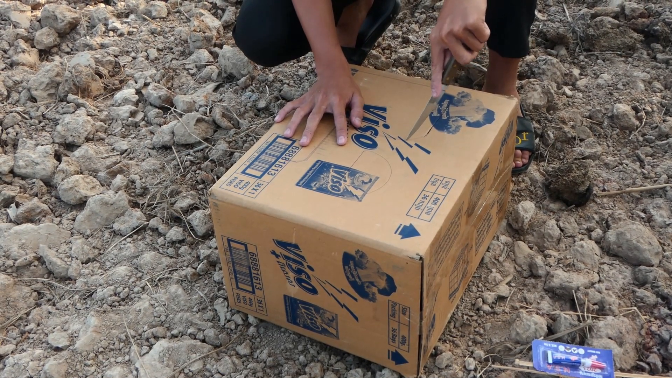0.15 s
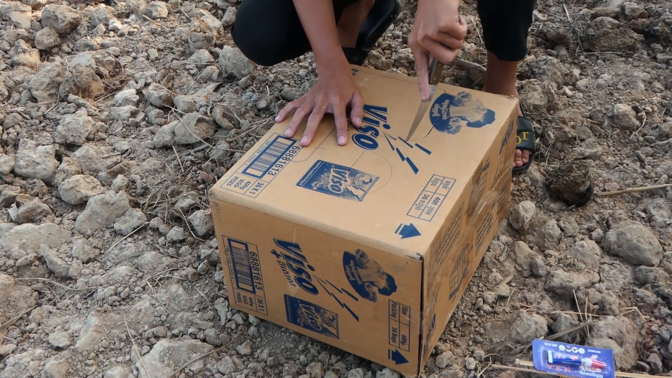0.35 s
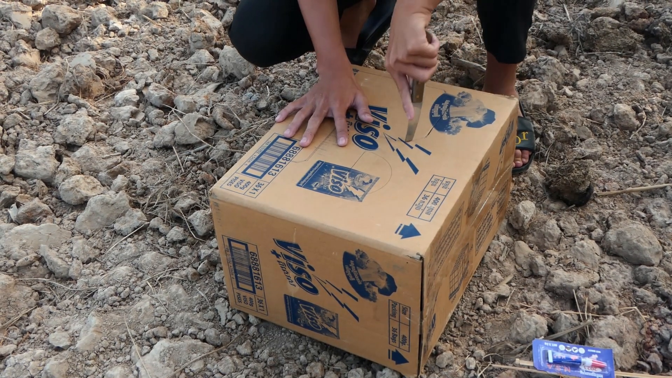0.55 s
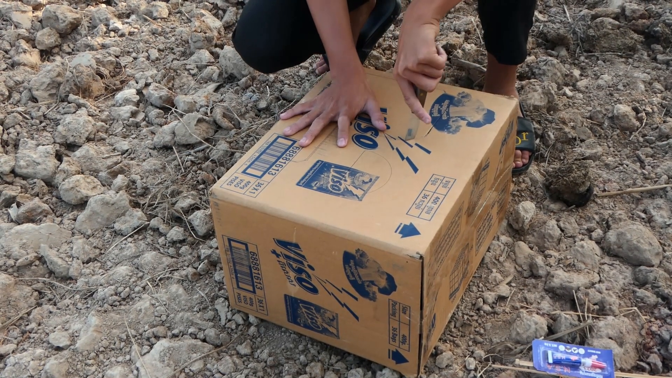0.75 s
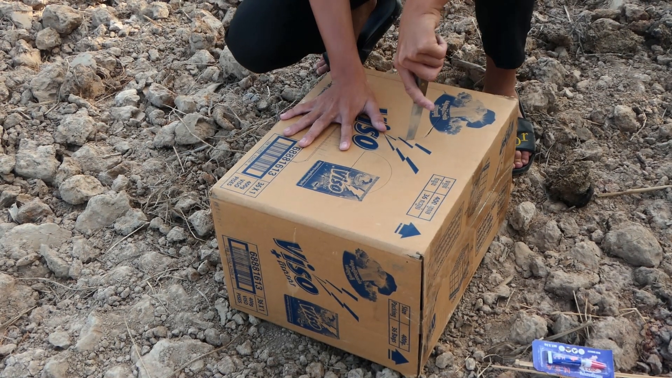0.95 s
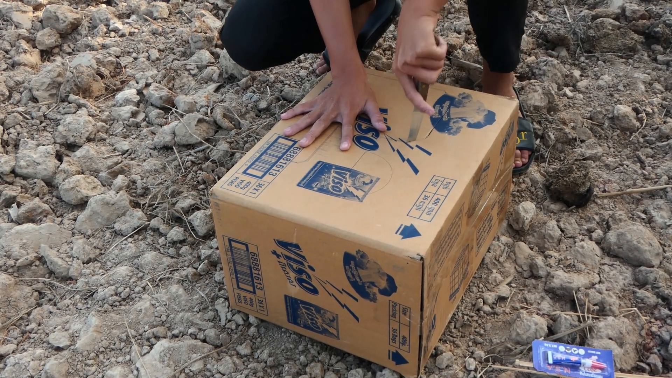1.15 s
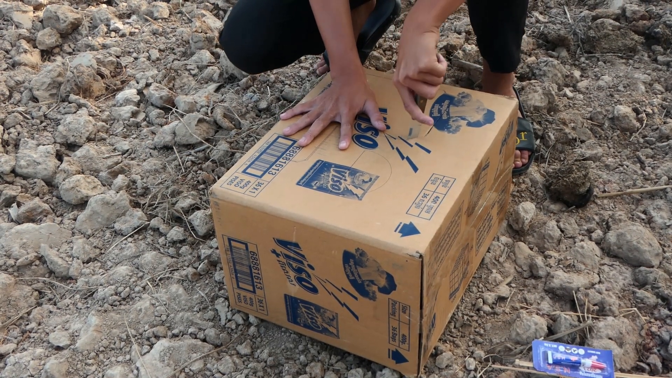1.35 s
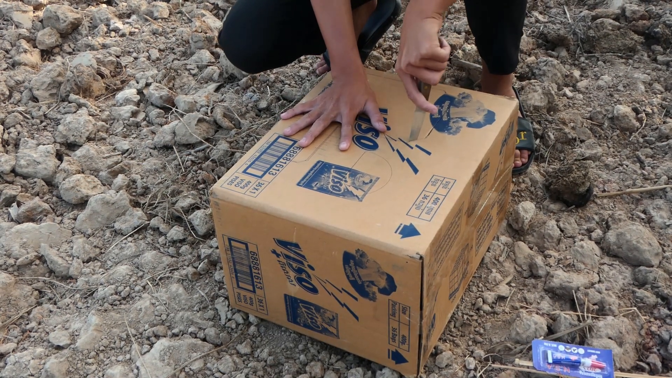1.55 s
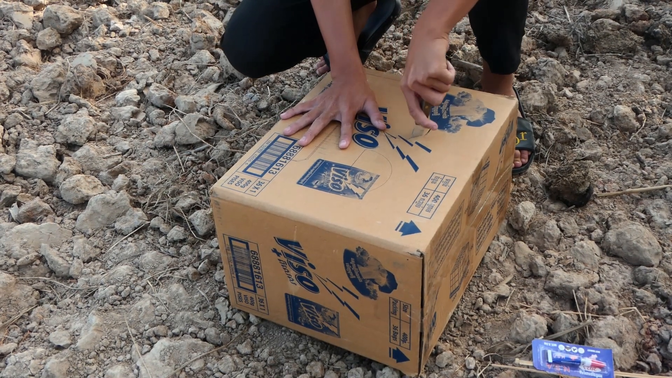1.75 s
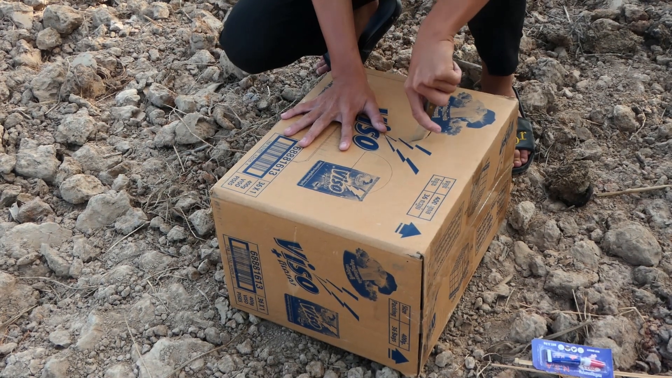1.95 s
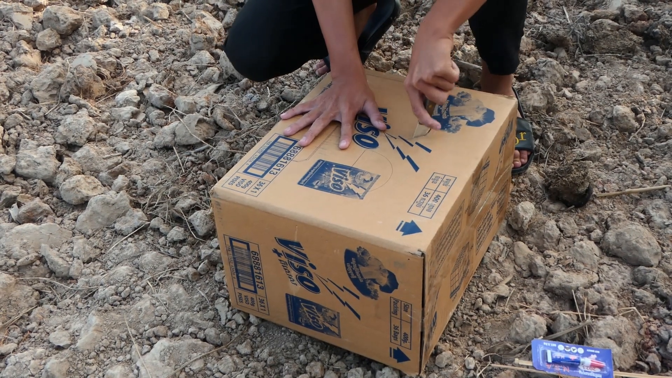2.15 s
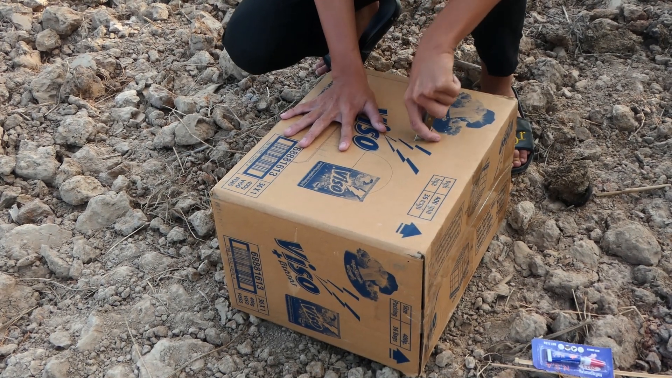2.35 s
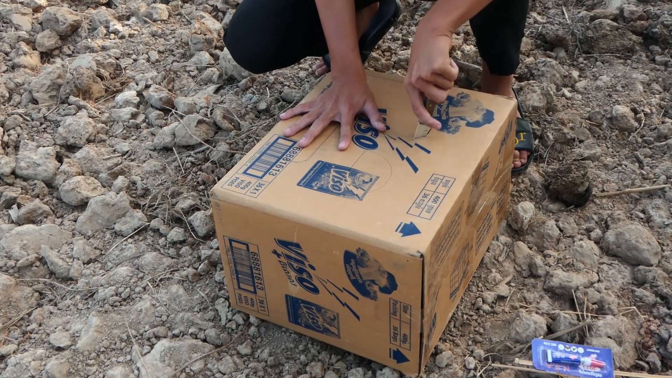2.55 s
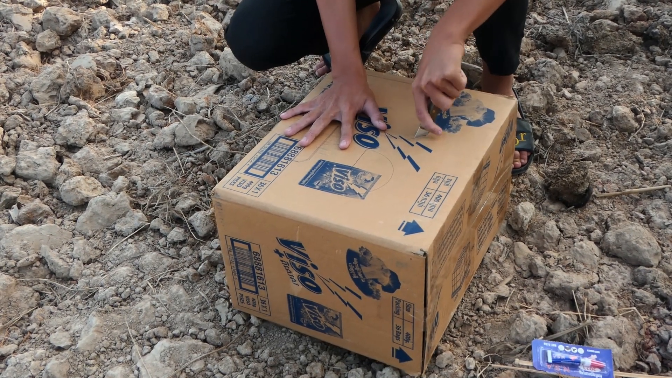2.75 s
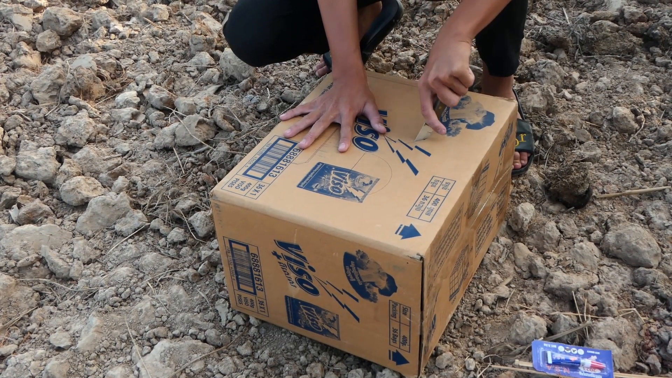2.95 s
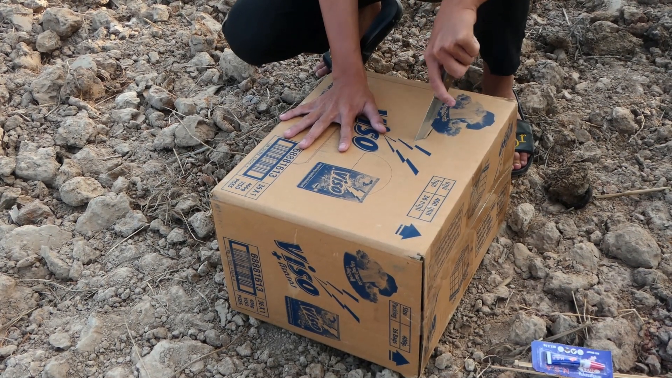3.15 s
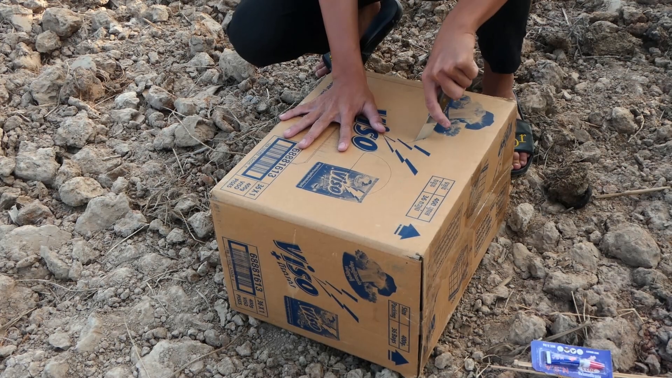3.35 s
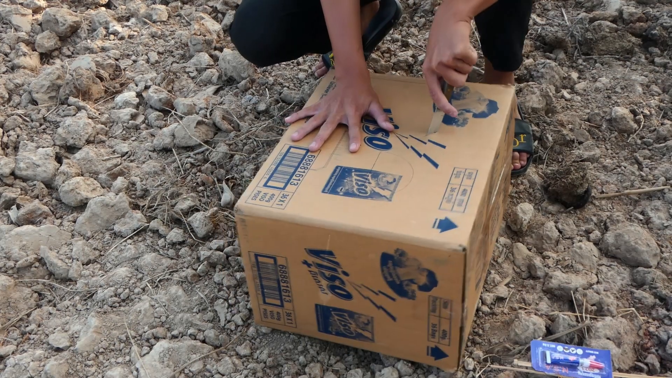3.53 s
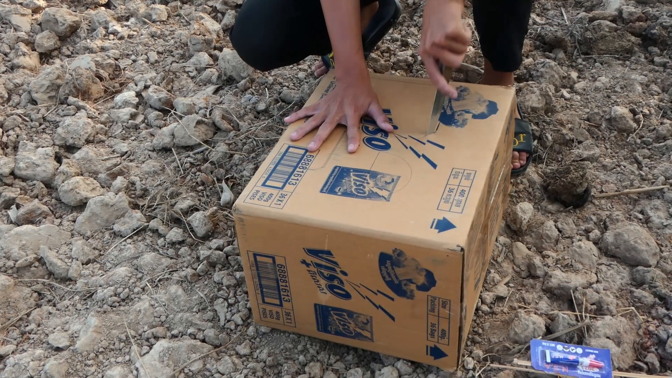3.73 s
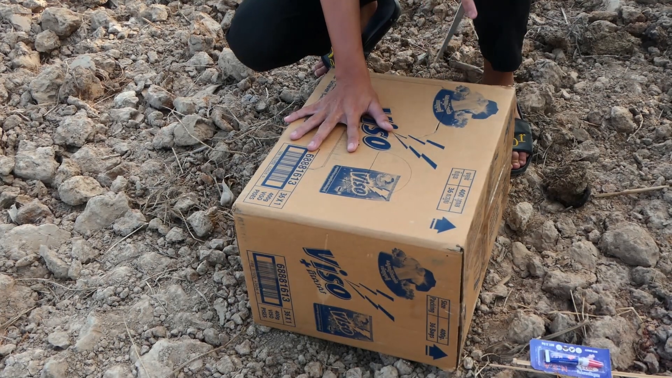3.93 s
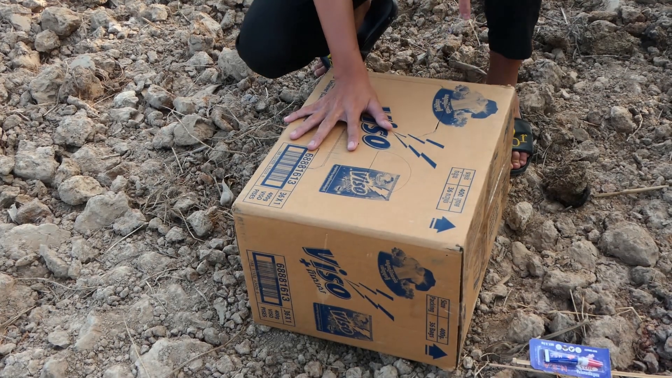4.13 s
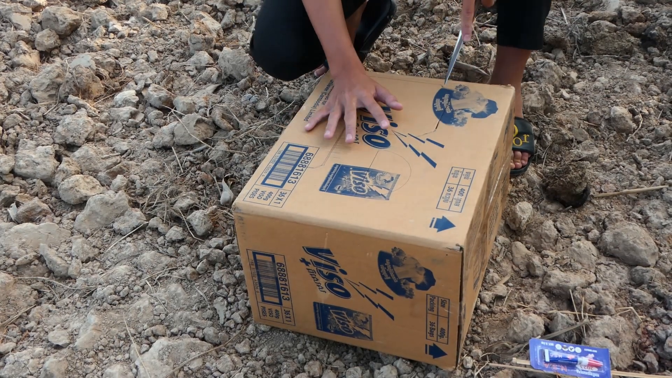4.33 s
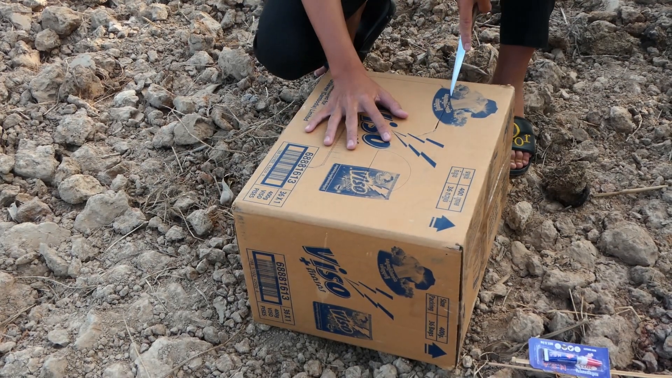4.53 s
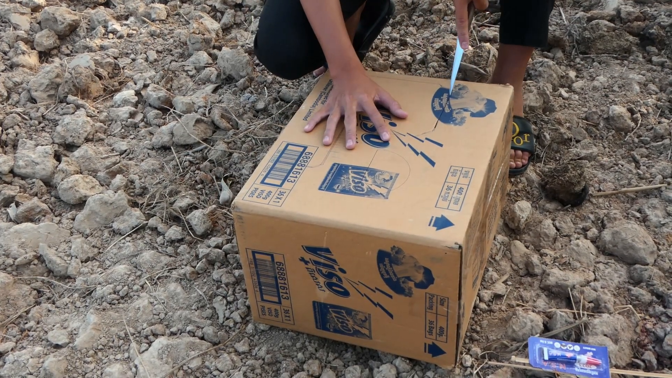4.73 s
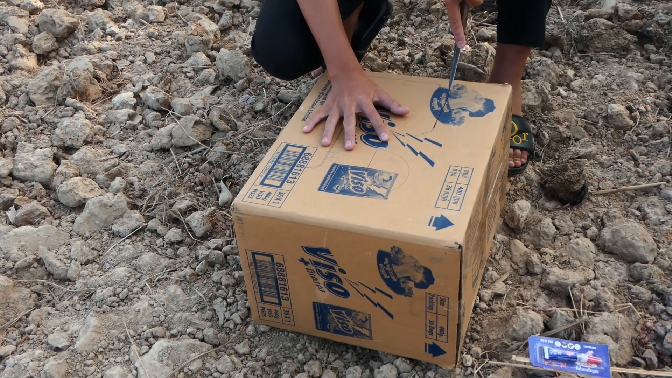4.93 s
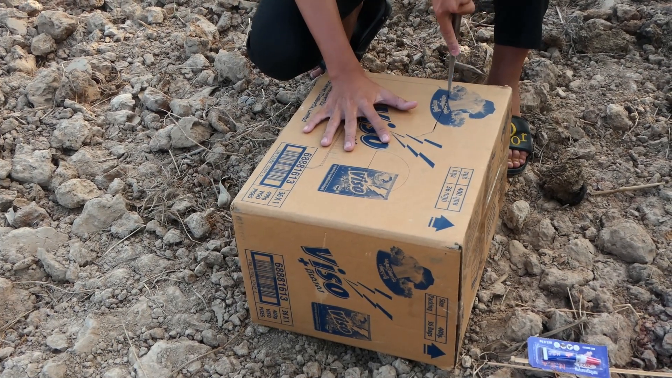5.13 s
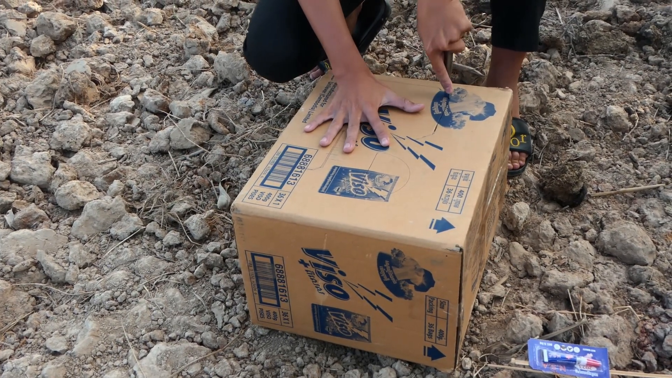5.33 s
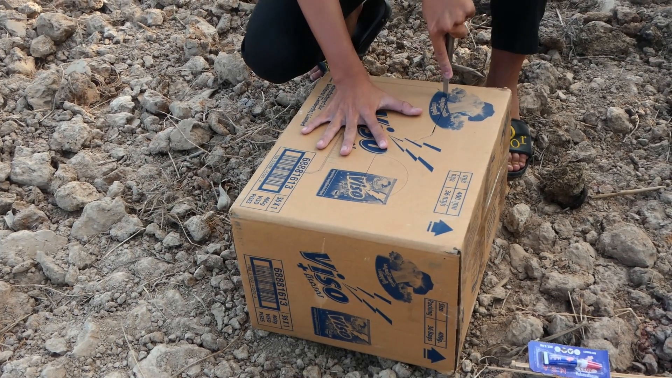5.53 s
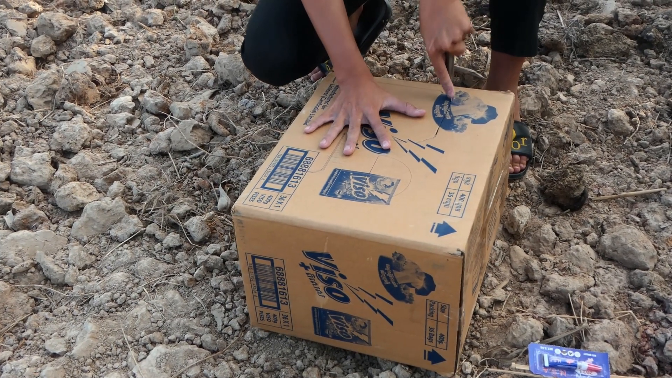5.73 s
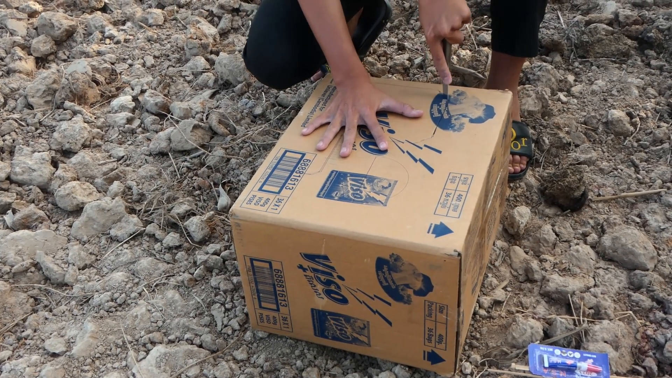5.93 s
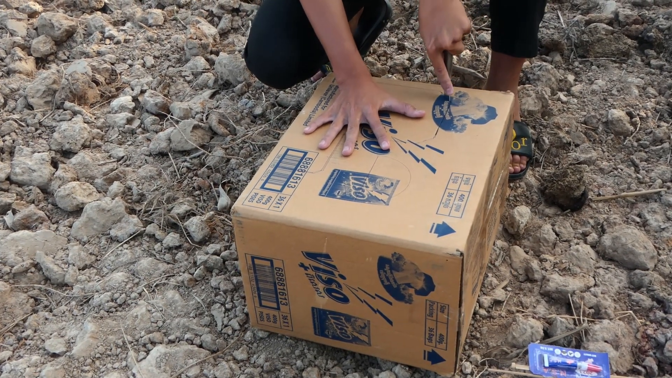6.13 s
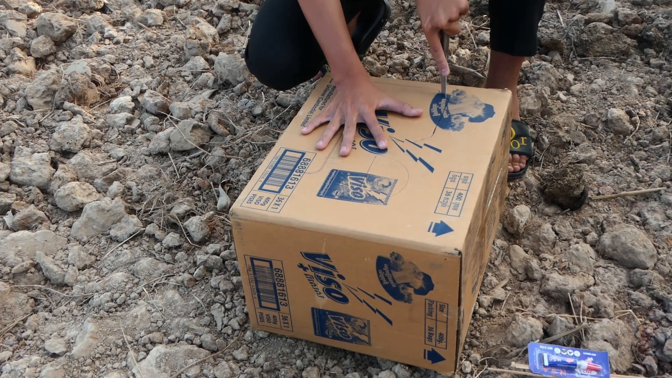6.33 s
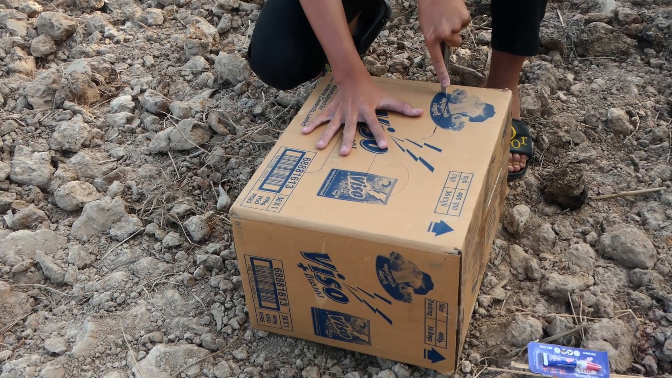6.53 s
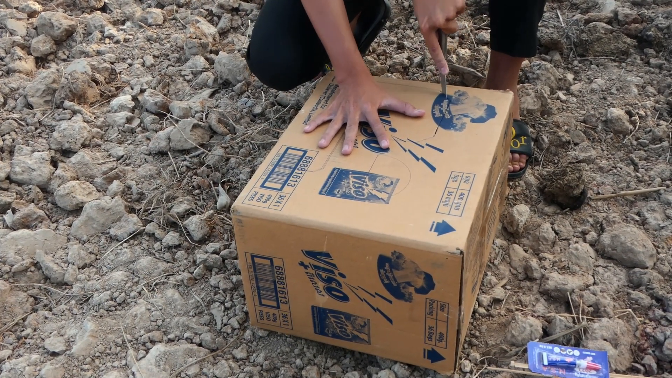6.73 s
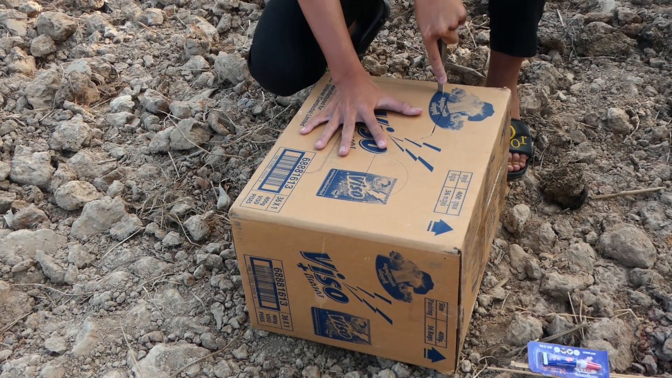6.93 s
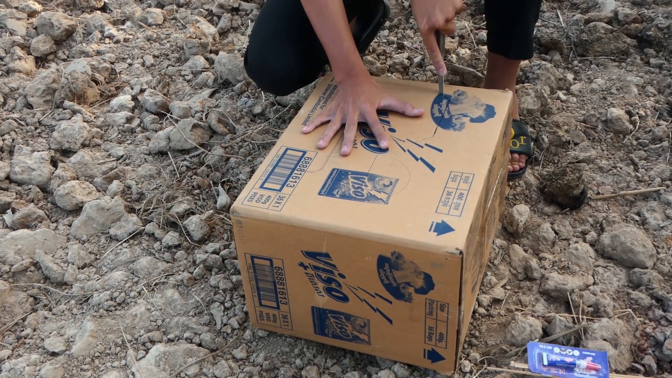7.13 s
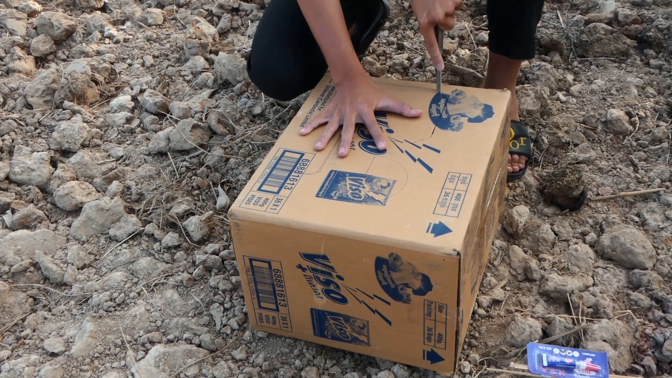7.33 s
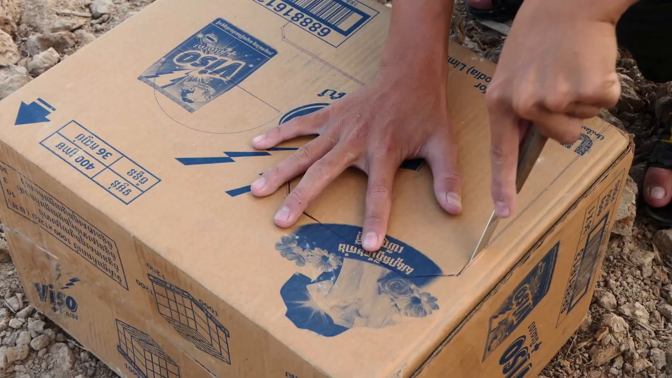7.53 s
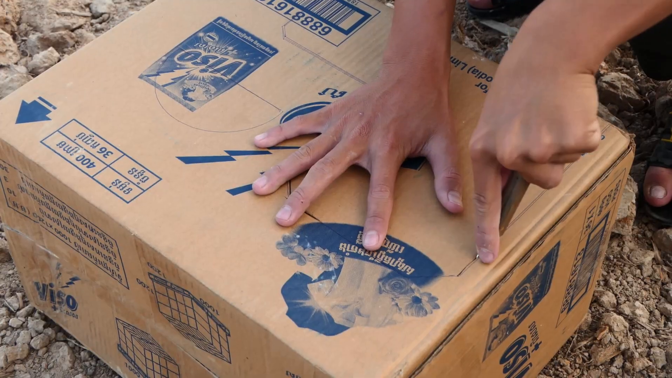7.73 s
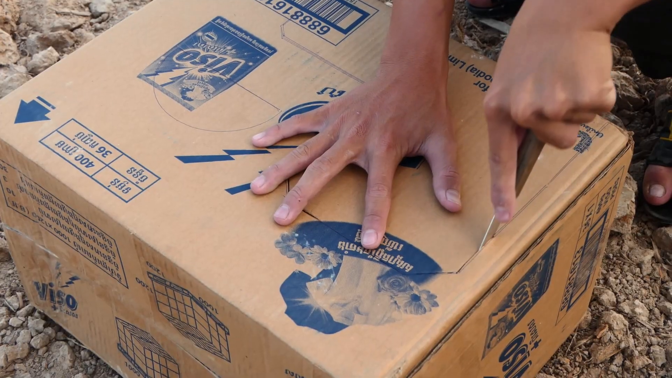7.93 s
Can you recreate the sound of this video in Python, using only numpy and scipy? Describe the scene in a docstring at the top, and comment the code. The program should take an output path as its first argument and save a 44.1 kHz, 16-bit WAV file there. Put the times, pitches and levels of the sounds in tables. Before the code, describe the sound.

A knife saws through the lid of a corrugated cardboard box, outdoors and slightly right of the microphone, over a soft hiss and a faint distant hum. From about 0.2 seconds come short, uneven rasping strokes, around four or five a second, each swelling and stopping with a hollow boom from the box and a fine fizz of tearing fibres. The lid knocks, the board cracks and the blade ticks, with tiny squeaks near 1.4 and 3.5 seconds and a dull crunch at 3.6. The sawing pauses from about 3.9 to 5 seconds, leaving only a few faint bumps. At 5.3 seconds the blade stabs in with a sharp, loud crack, and steadier strokes follow. From about 7.5 seconds a low, lumpy microphone handling rumble runs under a last close stroke and several knocks, until the end just after 8 seconds.

```python
"""A knife rasps through the lid of a corrugated cardboard box, outdoors on dry ground, over a soft hiss
and a far hum. It saws, pauses, stabs in again and saws on, a little right of the microphone.
Each stroke swells as the blade bites and stops as it turns; the tearing fibres drive the hollow box,
the stiff board and a fine fizz. The lid knocks, flutes crack, the blade ticks and squeaks in the slot.
At the end the microphone is close and rumbles with handling."""
import sys
import numpy as np
from scipy import signal
from scipy.fft import rfft, irfft, next_fast_len
from scipy.io import wavfile
from scipy.ndimage import uniform_filter1d, map_coordinates

SR = 44100
rng = np.random.default_rng(int(sys.argv[2]) if len(sys.argv) > 2 else 0)


def inscribe(sig):
    """Save sig as 16-bit PCM at rate SR to the path in sys.argv[1].

    A 1-D sig is mono; a 2-D sig holds one channel per row.
    Samples are clipped to [-1, 1] before scaling.
    """
    pcm = np.round(np.clip(np.atleast_2d(sig).T, -1, 1) * 32767)
    wavfile.write(sys.argv[1], SR, pcm.astype(np.int16))


N = 356328

# The blade taps the slot as it turns round. Each row: time in seconds, relative peak in dB.
BLADE_TAPS = [(0.877, -33), (1.201, -29), (1.574, -35), (1.9833, -26.5), (1.9928, -31), (2.17, -33),
              (2.342, -25), (2.5207, -32), (2.6234, -24), (2.803, -33), (2.9355, -25), (2.954, -43),
              (3.05, -33), (3.2823, -33.5), (3.4404, -32), (5.035, -34), (6.4183, -28.5), (6.6225, -30.5),
              (6.759, -28), (6.796, -30), (7.1267, -29), (7.1694, -33), (7.473, -27.5), (7.5094, -30.5)]


def amp(db):
    """Decibels to gain."""
    return 10 ** (np.asarray(db) / 20)


def unit(x):
    """x at rms 1."""
    return x / np.sqrt(np.mean(x ** 2) + 1e-20)


def along(points, hz):
    """(Hz, value) points read on a log axis."""
    freqs, values = np.transpose(points)
    return np.interp(np.log(hz + 1), np.log(freqs + 1), values)


def curves(rows):
    """One value per sample for each column after the time."""
    times, *columns = np.transpose(rows)
    return [np.interp(np.arange(N) / SR, np.sort(times), column) for column in columns]


def wobble(rate):
    """A smooth random curve, rate knots a second."""
    return map_coordinates(rng.standard_normal(int(N * rate / SR) + 4), [np.arange(N) * rate / SR])


def arch(middle, length, droop_db=12):
    """Gain of a swell that is strongest at its middle and droop_db lower at both ends."""
    position = 2 * (np.arange(N) / SR - middle) / length
    return amp(-np.minimum(droop_db * position ** 2, 200))


def filtered(x, response):
    """x times a response of frequency."""
    size = next_fast_len(x.shape[-1] + 8192)
    return irfft(rfft(x, size) * response(np.fft.rfftfreq(size, 1 / SR)), size)[..., :x.shape[-1]]


def coloured(x, spectrum):
    """x shaped by a (Hz, dB) curve."""
    return filtered(x, lambda hz: amp(along(spectrum, hz)))


def resonate(x, modes, low_hz, high_hz, order):
    """x through a set of resonances that radiate between two edges, at rms 1."""
    def response(hz):
        return sum((-1) ** k * amp(db) * 1j * hz * width / (centre ** 2 - hz ** 2 + 1j * hz * width)
                   for k, (centre, width, db) in enumerate(modes))
    band = signal.butter(order, [low_hz, high_hz], "band", fs=SR, output="sos")
    return unit(signal.sosfilt(band, filtered(x, response)))


def add(track, start, sound, peak_db):
    """Lay a sound into the track, start seconds in."""
    span = track[round(start * SR):][:len(sound)]
    span += amp(peak_db) * sound[:len(span)] / np.abs(sound).max()


def wide_noise(spectrum, side_db):
    """Stereo noise whose middle has rms 1."""
    mid, side = (unit(coloured(rng.standard_normal(N), spectrum)) for _ in range(2))
    return np.array([mid + amp(side_db) * side, mid - amp(side_db) * side])


def background(hum_hz=60.5):
    """Open-air hiss all round, leaning right, and a wavering hum far off."""
    # Each row: time in seconds, mean hiss level in dB, mean hum level in dB.
    levels = [(0, -50.5, -54.5), (2.5, -50.5, -71), (4.8, -50.5, -63), (5.2, -49, -61), (7.54, -48, -52.5),
              (7.64, -57, -62), (7.9, -64, -58), (7.97, -55, -62), (8.08, -47, -59)]
    # The hiss. Each row: frequency in Hz, relative level in dB.
    air_tone = [(20, -45), (45, -3), (100, 12), (160, 5.5), (230, 4), (310, 2.5), (460, -6), (1300, -4),
                (4000, -7.5), (6200, -9), (8000, -16), (12000, -25), (15800, -24)]
    air_db, hum_db = curves(levels)
    air = amp(air_db + 0.49 * wobble(13)) * wide_noise(air_tone, side_db=-5.5) * amp([[-1], [1]])
    hum_peak = amp(hum_db + 1.6 * wobble(4.02)) * np.sqrt(2)
    pitch = hum_hz * (1 + 0.0083 * wobble(11))
    return air + hum_peak * np.sin(2 * np.pi * np.cumsum(pitch) / SR)


def handling():
    """Handling the microphone makes a lumpy rumble at the end."""
    # Each row: time in seconds, mean level in dB.
    levels = [(7.54, -77), (7.56, -34), (7.7, -33), (7.9, -34), (7.96, -33), (8.08, -41)]
    # Each row: frequency in Hz, relative level in dB.
    tone = [(15, -49), (25, -26), (76, -4.5), (130, -0.5), (189, -8), (244, -3), (383, -18), (452, -28.5),
            (900, -35), (1170, -69), (1980, -120)]
    return amp(curves(levels)[0] + 1.6 * wobble(40)) * wide_noise(tone, side_db=-2.5)


def on_ground(x, t60=0.055):
    """The box stands a little to the right; stones scatter its sound differently to each side."""
    # Each row: frequency in Hz, level of the ground scatter in dB.
    spread = [(100, -16), (300, -23.5), (550, -13.5), (1200, -13.5), (4000, -13), (12000, -11.5)]
    # Each row: frequency in Hz, left minus right in dB.
    balance = [(60, 0), (200, -2.5), (600, -2.5), (2200, -3), (4400, -1), (8000, 0)]
    t = np.arange(SR // 16) / SR
    scatter = rng.standard_normal(len(t)) * amp(-60 * t / t60) * (t > .002)
    side = coloured(signal.fftconvolve(x, scatter / np.linalg.norm(scatter))[:N], spread)
    stereo = np.array([x + side, x - side])
    return filtered(stereo, lambda hz: amp(np.outer([.5, -.5], along(balance, hz))))


def grit(rate=300, level_db=-59):
    """Grit rustles faintly under the box and the feet."""
    grains = (rng.random(N) < rate / SR) * rng.uniform(-1, 1, N) * amp(4.5 * wobble(17))
    rustle = coloured(grains, [(150, -17), (400, -1.5), (2000, -2), (6000, -10.5), (14000, -21.5)])
    return amp(level_db) * unit(rustle)


def rocking(hz=88, width_hz=45, gain_db=-1):
    """Under hard strokes the whole box sways on the ground at its lowest resonance."""
    # Each row: middle in seconds, length in seconds, relative level in dB.
    sways = [(2.02, 0.084, -39), (2.12, .14, -47), (2.274, 0.14, -37), (2.61, 0.24, -39),
             (2.88, 0.078, -34.5), (3.639, 0.11, -34)]
    gain = sum(amp(db + gain_db) * arch(middle, length) for middle, length, db in sways)
    return gain * resonate(rng.standard_normal(N), [(hz, width_hz, 0)], low_hz=68, high_hz=158, order=4)


def knocks(swell_s=0.0057, t60=0.05, gain_db=-1.5):
    """The lid gives way or is bumped: a soft push sets it swinging for a few cycles."""
    # Each row: start in seconds, relative peak in dB, panel pitch in Hz.
    bumps = [(0.176, -31.5, 117), (0.257, -17, 193), (0.616, -12, 215), (0.721, -19.5, 242),
             (0.897, -8, 213), (1.421, -21.5, 226), (2.234, -16.5, 308), (2.43, -8, 226),
             (2.582, -17.5, 213), (2.607, -19, 220), (2.875, -27, 150), (3.574, -20, 275),
             (3.586, -12.5, 196), (3.635, -13, 202.5), (4.496, -34, 194), (4.548, -35.5, 163),
             (4.614, -28, 241), (5.032, -36.5, 124), (5.097, -28, 318), (5.199, -28, 189), (5.28, -16, 340),
             (5.32, -19.5, 239), (5.462, -33, 208), (5.889, -25, 250), (5.955, -23.5, 318),
             (6.616, -27, 287), (6.948, -31.5, 290), (7.552, -24, 134), (7.616, -22, 134),
             (7.716, -16.5, 166), (7.79, -21.5, 240), (7.863, -19.5, 239), (7.9, -20, 144),
             (8.038, -24.5, 187)]
    # Each row: multiple of the panel pitch, relative level in dB.
    partials = [(.6, -20.5), (1, 7.5), (1.5, -17), (2.3, -18.5)]
    track, t = np.zeros(N), np.arange(SR // 6) / SR
    envelope = amp(-60 * t / t60) * (1 - np.exp(-(t / swell_s) ** 3))
    for start, db, hz in bumps:
        ring = sum(amp(level + rng.normal(0, 3.3)) * np.sin(2 * np.pi * hz * ratio * t)
                   for ratio, level in partials)
        add(track, start, ring * envelope, db + gain_db)
    return track


def fibres(rate, scatter_db, rub, clump_db, clump_rate):
    """Fibres snap at random, in clumps, over the smooth rub of the steel."""
    breaks = (rng.random(N) < rate / SR) * rng.choice([-1, 1], N)
    breaks = breaks * amp(scatter_db * rng.standard_normal(N))
    force = unit(breaks) + rub * rng.standard_normal(N)
    return unit(force * amp(clump_db * wobble(clump_rate)))


def crush():
    """Flutes collapse with a dull, coarse crunch as the blade is levered out."""
    # Each row: middle in seconds, length in seconds, level in dB.
    crunches = [(3.589, 0.041, -32), (3.644, 0.03, -36.5)]
    # Each row: frequency in Hz, relative level in dB.
    tone = [(300, -21), (520, 3), (800, -2), (1100, -12), (2000, -13), (5000, -34)]
    grains = fibres(rate=990, scatter_db=7, rub=1.0, clump_db=5.0, clump_rate=160)
    gain = sum(amp(db) * arch(middle, length) for middle, length, db in crunches)
    return gain * unit(coloured(grains, tone))


def snaps(events, tone, t60, tail_db, tail_t60, gain_db):
    """Short bursts of noise, each with a faint tail from the board."""
    track, t = np.zeros(N), np.arange(SR // 12) / SR
    envelope = amp(-60 * t / t60) + amp(tail_db - 60 * t / tail_t60)
    for start, db in events:
        add(track, start, coloured(rng.standard_normal(len(t)) * envelope, tone), db + gain_db)
    return track


def cracks():
    """A flute cracks as the blade breaks through it."""
    # Each row: time in seconds, relative peak in dB.
    breaks = [(0.262, -27), (0.302, -24.5), (0.475, -21.5), (0.505, -35), (0.62, -11.5), (0.863, -26.5),
              (1.632, -26), (2.374, -26), (3.634, -23), (4.611, -26.5), (5.091, -30), (5.283, -16),
              (5.327, -2), (5.526, -28.5), (5.759, -28), (6.127, -27), (6.453, -24.5), (6.976, -25),
              (7.717, -28)]
    # Each row: frequency in Hz, relative level in dB.
    tone = [(100, -30), (200, -24), (350, 20.5), (650, -14), (1000, 7.5), (1900, 5), (2800, -8), (4000, -6),
            (7000, -17.5), (14000, -20)]
    return snaps(breaks, tone, t60=0.015, tail_db=-16, tail_t60=0.058, gain_db=-2.5)


def ticks():
    """The turning blade strikes the slot with a bright tick."""
    # Each row: frequency in Hz, relative level in dB.
    tone = [(800, -28), (2000, 18), (4200, 11.5), (7500, 12), (15000, -9)]
    return snaps(BLADE_TAPS, tone, t60=0.0038, tail_db=-14, tail_t60=0.091, gain_db=-1.0)


def skids(start_hz=5200, end_hz=2400, fall_s=.014, t60=0.15, gain_db=-6.5):
    """After a tap the blade skids briefly: a dry, falling scratch, pitched differently each time."""
    track, t = np.zeros(N), np.arange(SR // 16) / SR
    glide = end_hz + (start_hz - end_hz) * np.exp(-t / fall_s)
    for start, db in BLADE_TAPS:
        pitch = glide * np.exp(rng.uniform(-0.18, .15))
        roughness = uniform_filter1d(rng.standard_normal(len(t)), size=28)
        scratch = roughness * np.sin(2 * np.pi * np.cumsum(pitch) / SR)
        add(track, start, scratch * amp(-60 * t / t60), db + gain_db)
    return track


def squeaks(jitter=0.057, flutter_db=4, scrape=0.18):
    """The flat of the blade sticks and slips in the slot: a rough tone slides onto a pitch and off."""
    # Each row: start and length in seconds, first, held and last pitch in Hz, relative level in dB.
    slips = [(1.379, 0.024, 2250, 2760, 3200, -35), (1.388, 0.016, 1300, 1680, 2300, -37),
             (1.4, 0.024, 2600, 2750, 4020, -29.5), (3.503, 0.024, 2500, 3260, 4230, -29.5),
             (3.531, 0.018, 3470, 3070, 3350, -25.5), (3.549, .016, 3360, 2850, 2090, -27)]
    # The first four harmonics, each a relative level in dB.
    harmonics = [-7.5, -11, -11, -17]
    # The steel favours three bands. Each row: frequency in Hz, gain in dB.
    steel = [(1000, 2), (3100, 4), (4600, -4.5), (6300, 5), (7600, -2.5), (9800, 2.5), (13000, -4)]
    track, t = np.zeros(N), np.arange(N) / SR
    unsteady, flutter = 1 + jitter * wobble(3000), flutter_db * wobble(600)
    for start, length, first_hz, held_hz, last_hz, level in slips:
        near = np.abs(t - start - length / 2) < length
        position = np.clip(2 * (t[near] - start) / length - 1, -1, 1)
        pitch = held_hz + (np.where(position < 0, first_hz, last_hz) - held_hz) * position ** 2
        phase = 2 * np.pi * np.cumsum(pitch * unsteady[near]) / SR
        tone = sum(amp(db) * np.sin(k * phase) for k, db in enumerate(harmonics, 1))
        gain = arch(start + length / 2, length, droop_db=9)[near] * amp(level + flutter[near])
        track[near] += gain * (tone + scrape * rng.standard_normal(N)[near])
    return coloured(track, steel)


def shifting(x, depth_db):
    """The colour shifts in patches as the blade meets new parts of the board."""
    spectra = signal.stft(x, nperseg=512)[2]
    patches = uniform_filter1d(rng.standard_normal(spectra.shape), size=4, axis=0)
    patches = uniform_filter1d(patches, size=16, axis=1)
    return unit(signal.istft(spectra * amp(depth_db * unit(patches)), nperseg=512)[1][:N])


def stroke_gains(strokes, sag_db=5.5, fizz_follows=1.1):
    """Rasp, boom and fizz gains: each stroke bites, swells to its hardest, eases off and stops."""
    bite_s, stop_s, box_stop_s = 0.032, 0.019, 0.032  # time to rise or fall by 20 dB
    gains = np.zeros((3, N))
    for start, press, ease, swell_db, rasp_db, boom_db, fizz_db in strokes:
        near = slice(max(round(start * SR) - SR // 5, 0), round((start + press + ease) * SR) + SR // 5)
        t = np.arange(N)[near] / SR - start
        force_db = -swell_db * np.clip(1 - t / press, 0, 1) ** 2
        force_db -= sag_db * np.clip((t - press) / ease, 0, 1) ** 2
        force_db += 20 * np.minimum(t, 0) / bite_s
        after = np.maximum(t - press - ease, 0)
        gains[:, near] += amp([rasp_db + force_db - 20 * after / stop_s,
                               boom_db + force_db - 20 * after / box_stop_s,
                               fizz_db + fizz_follows * force_db - 20 * after / stop_s])
    return gains


def cut(strokes, box, board, box_top_hz, rasp_db, boom_db, fizz_db):
    """One tearing force rasps in the board, booms in the hollow box and fizzes at the edge itself."""
    # Each row: frequency in Hz, relative level in dB.
    fizz_tone = [(2500, -3), (4500, 0), (5500, 2.5), (6300, -1.5), (7500, -1.5), (10000, -2.5),
                 (15800, -7.5)]
    rasp, boom, fizz = stroke_gains(strokes)
    force = fibres(rate=4000, scatter_db=4.0, rub=0.5, clump_db=1.5, clump_rate=260)
    tearing = shifting(force, depth_db=2.0)
    sound = rasp * amp(rasp_db) * resonate(tearing, board, low_hz=536, high_hz=5500, order=2)
    sound += boom * amp(boom_db) * resonate(force, box, low_hz=101.6, high_hz=box_top_hz, order=5)
    edge = tearing + 1.02 * rng.standard_normal(N)  # the finest fibres merge into a hiss
    return sound + fizz * amp(fizz_db) * unit(coloured(edge, fizz_tone))


def sawing(second_cut_s=4.5, close_s=7.65):
    """The knife saws one side of the lid, then another; the last stroke is close to the microphone."""
    # Each row: start, pressing time and easing time in seconds, swell in dB,
    # then relative levels of board rasp, box boom and edge fizz in dB.
    strokes = [ (.24, 0.027, .005, 3, -38, -30.5, -52), (0.297, 0.0091, .027, 27, -46.5, -40.5, -62),
               (.391, .005, 0.048, -1.5, -44.5, -37.5, -57), (0.472, 0.16, 0.093, 9.5, -29.5, -25, -41.5),
               (0.928, 0.15, .023, 12.5, -39, -33.5, -45), (1.212, 0.07, 0.036, 12.5, -29.5, -25, -37.5),
               (1.435, 0.084, 0.047, 4, -39, -32, -44.5), (1.646, 0.055, 0.041, 8, -29.5, -27.5, -39.5),
               (1.835, .051, 0.057, -1.5, -48, -36.5, -53), (2.044, 0.062, .008, 5, -31, -24.5, -41),
               (2.185, 0.093, 0.03, 12, -44.5, -33.5, -49), (2.364, 0.069, 0.013, 21.5, -33, -23.5, -40.5),
               (2.524, 0.066, 0.043, 14.5, -46, -31, -49), (2.673, 0.063, 0.017, 5.5, -43, -32.5, -49.5),
               (2.812, 0.037, 0.096, 17, -46, -35, -50.5), (2.97, 0.055, .005, 15, -45.5, -41.5, -62),
               (3.088, 0.11, 0.029, 2.5, -42.5, -32.5, -46.5), (3.302, 0.088, 0.014, 9.5, -36, -30, -43),
               (3.474, 0.039, 0.05, 5.5, -47.5, -44.5, -43.5), (3.572, 0.011, .1, -1, -43, -28.5, -49),
               (3.77, 0.069, 0.021, 3.5, -37.5, -27.5, -41.5), (5.0, 0.12, 0.15, 9, -61, -50, -58),
               (5.275, 0.076, 0.061, 3.5, -29, -30, -39.5), (5.531, 0.046, .075, 7, -37, -36.5, -46),
               (5.764, 0.081, .007, 8, -31, -33, -41.5), (5.91, 0.094, 0.047, 11.5, -39, -37.5, -46),
               (6.121, 0.052, 0.041, 19, -33, -34, -43.5), (6.275, 0.065, .04, 16.5, -33.5, -31.5, -43.5),
               (6.454, 0.034, 0.058, 16, -32.5, -31, -42), (6.602, 0.083, 0.042, 18.5, -37.5, -36, -46),
               (6.795, 0.087, 0.029, 20, -31.5, -31, -37.5), (6.966, 0.11, 0.024, 14.5, -38, -37, -42.5),
               (7.17, 0.062, 0.047, 20.5, -32.5, -31.5, -40), (7.33, 0.056, 0.061, 21, -38, -35.5, -45),
               (7.51, 0.035, 0.076, 20, -41.5, -40, -49.5), (7.724, 0.073, 0.014, 6.5, -38, -30, -42), ]
    # Box and board resonances along each cut. Each row: centre and width in Hz, relative level in dB.
    first_box = [(148, 78, -7.5), (213.5, 100, 1), (316, 85, 0.5), (419.4, 78, -5.5)]
    first_board = [(556, 28, 3.5), (781, 50, 7), (902, 69, -1), (1136, 89, 7), (1254, 53, 11.5),
                   (1375, 57, 11), (1756, 88, 4.5), (1916, 45, 7.5), (2200, 580, -3), (2764, 130, 8),
                   (3004, 200, -0.5), (3380, 230, 1.5), (4290, 440, -7)]
    second_box = [(112, 33, -8), (263, 69, -2), (349.5, 44, 0.5), (583, 106, -8)]
    second_board = [(702, 66, 0.5), (950, 98, 2.5), (1154, 46, 7.5), (1314, 71, 9.5), (1475, 150, 6.5),
                    (1610, 210, 3.5), (2130, 230, -1), (2794, 107, -2.5), (3330, 170, -4.5),
                    (3630, 510, -8), (5160, 180, -17)]
    first = [row for row in strokes if row[0] < second_cut_s]
    second = [row for row in strokes if second_cut_s <= row[0] < close_s]
    close = [row for row in strokes if row[0] >= close_s]
    saw = cut(first, first_box, first_board, box_top_hz=456, rasp_db=-0.33, boom_db=-1, fizz_db=2.1)
    saw += cut(second, second_box, second_board, box_top_hz=626, rasp_db=-0.5, boom_db=-1.37,
               fizz_db=1.75)
    return saw + cut(close, second_box, first_board, box_top_hz=690, rasp_db=3, boom_db=-5, fizz_db=2)


def scene():
    """Knife and box on the ground in front of the microphone, with open air behind."""
    cutting = sawing() + cracks() + ticks() + knocks() + crush() + grit() + rocking()
    return on_ground(cutting + skids() + squeaks()) + background() + handling()


def record(dry, top_hz=15830):
    """The microphone rings near its upper limit; nothing passes above top_hz."""
    # Each row: frequency in Hz, gain in dB.
    mic_response = [(8200, 0), (9700, 5.5), (11500, 2.5), (13000, -1), (14500, -7), (15800, -15)]
    return filtered(coloured(dry, mic_response), lambda hz: hz < top_hz)


dry = scene()
out = record(dry)
inscribe(out)
```